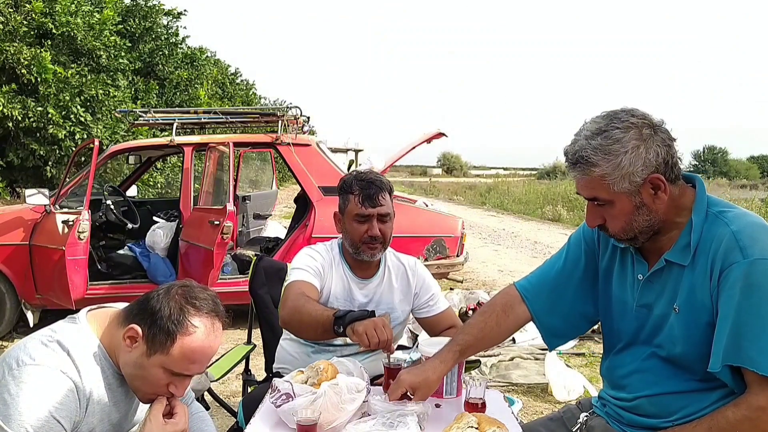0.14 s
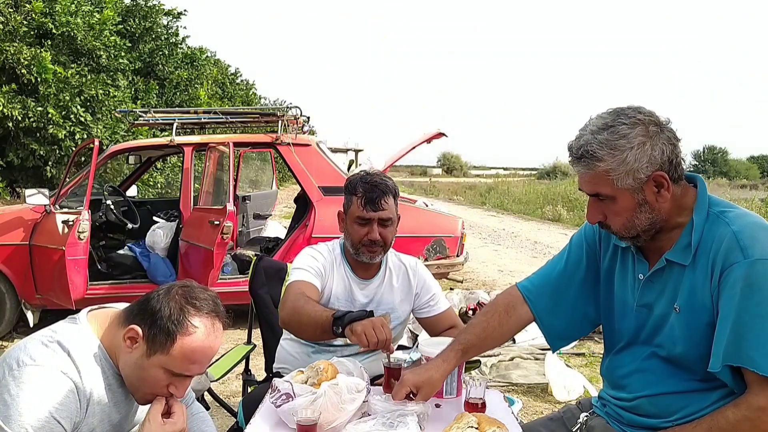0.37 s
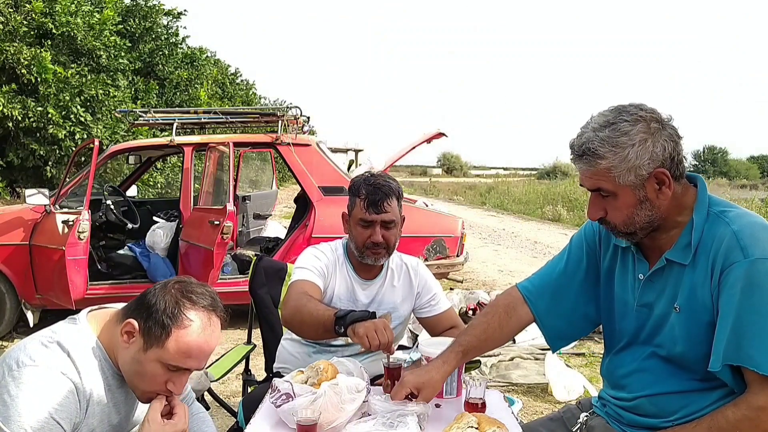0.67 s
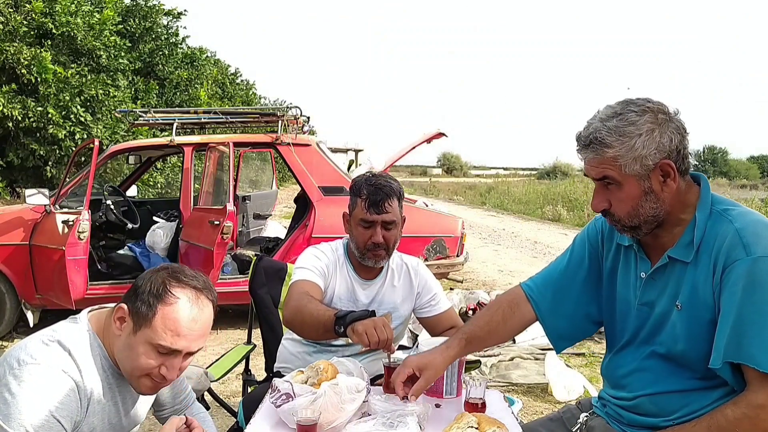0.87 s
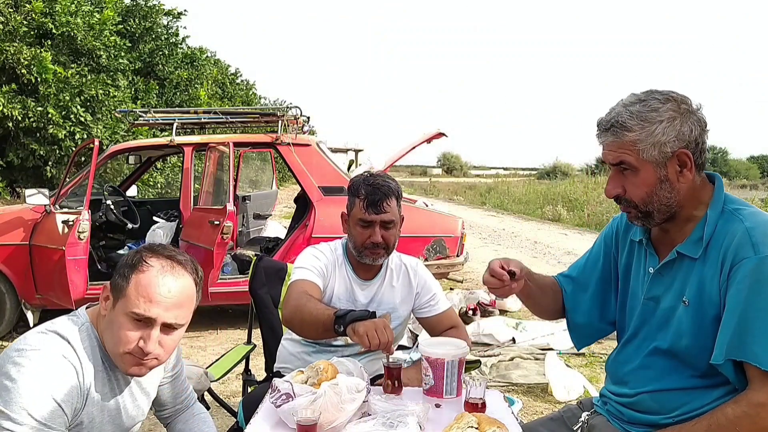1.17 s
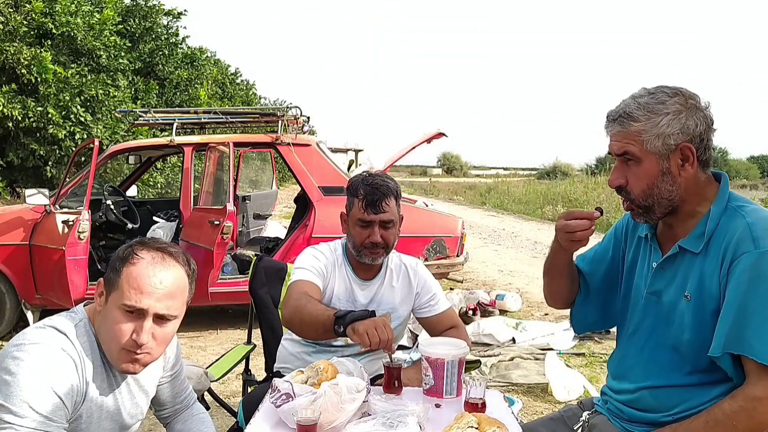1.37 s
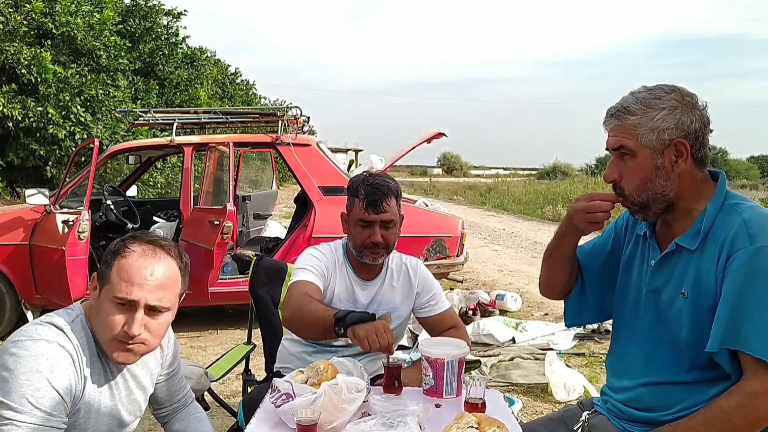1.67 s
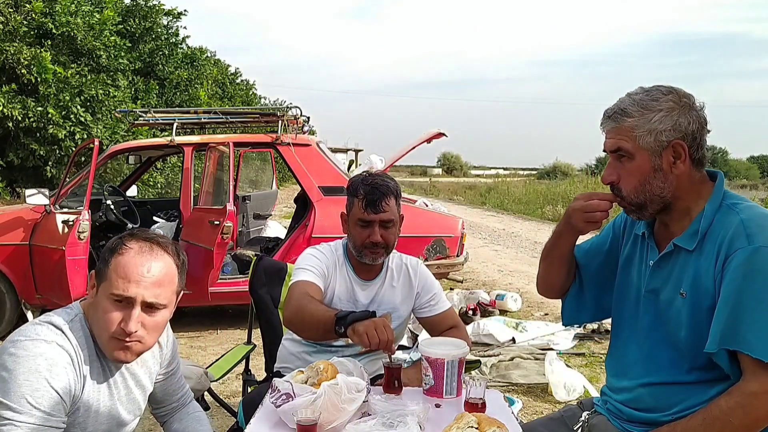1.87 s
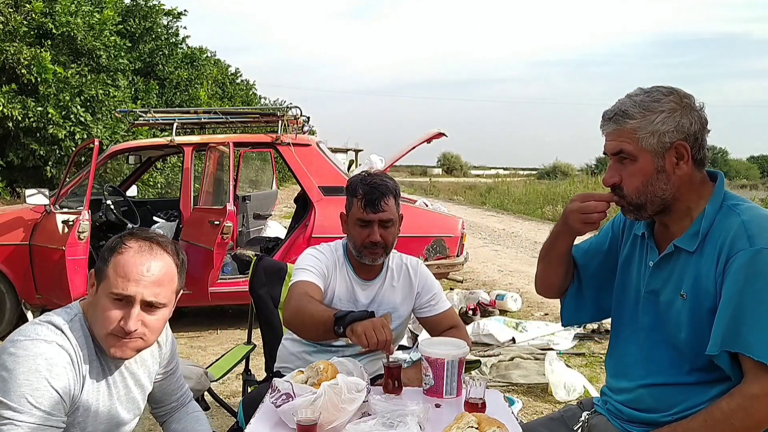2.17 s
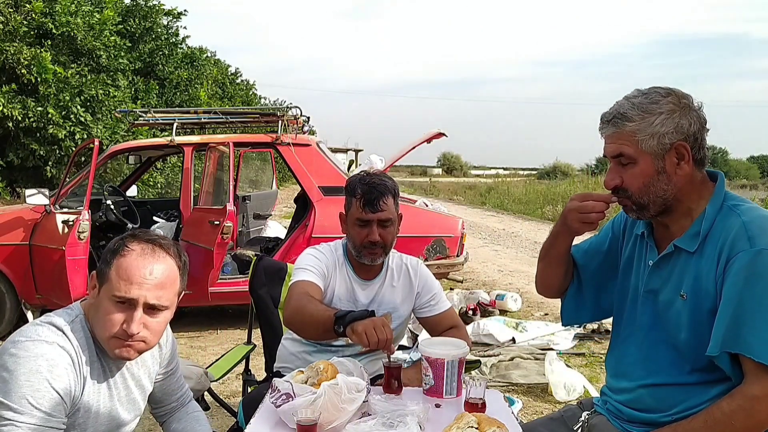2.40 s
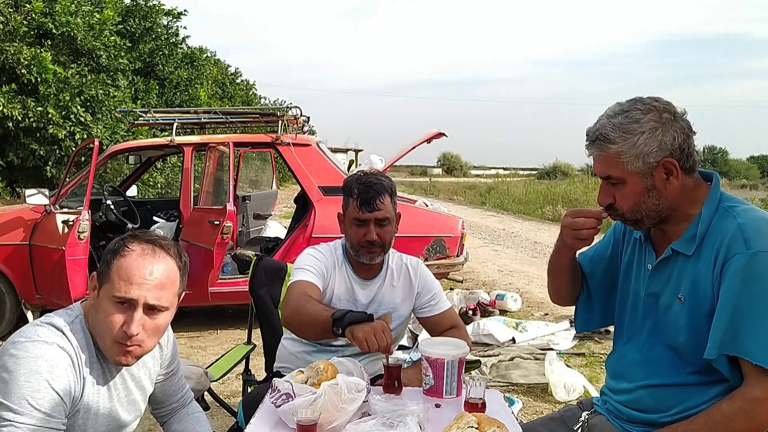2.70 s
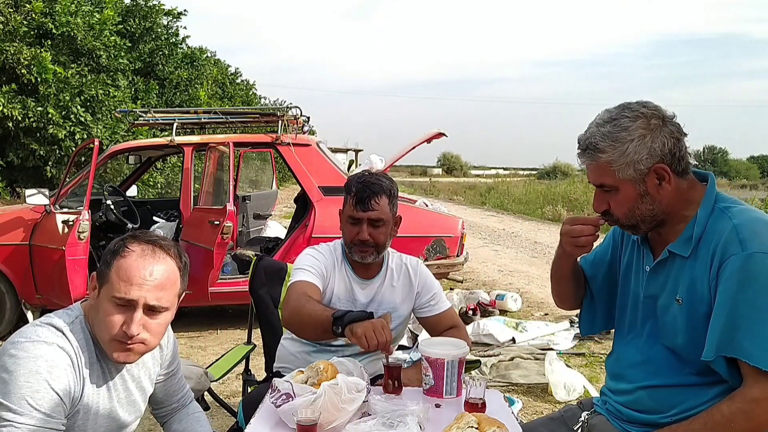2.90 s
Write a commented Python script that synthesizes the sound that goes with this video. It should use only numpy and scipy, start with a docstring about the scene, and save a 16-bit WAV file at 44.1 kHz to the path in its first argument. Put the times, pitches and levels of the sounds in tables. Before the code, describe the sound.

A metal teaspoon stirs tea in a small glass, quick bright ringing clinks outdoors.

```python
"""A steel teaspoon stirs tea in a small glass on an outdoor table, about four turns a second.
Each contact cuts off the old ring and starts a new one from decaying modes, with a crack, a click and a scrape
of noise. The glass's pitch sinks as the swirling tea climbs the wall, and wavers with every turn.
The rocking glass knocks on the table: short modes and a dull noise patter. A weak echo and faint open air,
made of coloured noise, lie behind."""
import sys
import numpy as np
from scipy import signal
from scipy.fft import rfft, irfft, next_fast_len
from scipy.io import wavfile
from scipy.ndimage import map_coordinates

SR = 44100
rng = np.random.default_rng(int(sys.argv[2]) if len(sys.argv) > 2 else 0)


def dump(signal):
    """Clip the signal to [-1, 1] and save it as 16-bit WAV at the path in sys.argv[1]."""
    limited = np.clip(np.atleast_2d(signal).T, -1, 1)
    pcm = np.round(limited * 32767).astype(np.int16)
    wavfile.write(sys.argv[1], SR, pcm)


N = 134505

# spoon meets glass: (time [s], relative levels of the tick, the spoon's ring, the glass's fundamental,
# low, middle and high modes [dB], scrape level [dB], rise scale [s]: longer when it glances)
CONTACTS = [(0.0418, -37, -53, -47.5, -45.5, -40, -47.5, -44, 0.00025),
            (0.0884, -30, -59, -44, -40.5, -38.5, -56, -44, 0.000074),
            (0.1102, -34.5, -56, -40.5, -46.5, -41.5, -52, -43.5, 0.0016),
            (0.1876, -26.5, -43.5, -46.5, -41, -44, -59, -40.5, 0.0003),
            (0.2872, -20, -55, -44, -51, -42, -41, -39.5, 0.001),
            (0.2973, -23.5, -57, -51.5, -49, -41, -44, -42.5, 0.00028),
            (0.4218, -53, -55, -90, -71, -55.5, -66, -52, 0.0002),
            (0.5733, -22.5, -37, -40, -37, -35, -44, -41, 0.00017),
            (0.6228, -37, -42, -43, -55, -44, -59, -40.5, 0.00045),
            (0.6712, -31.5, -41.5, -57, -55, -49, -49, -41, 0.0002),
            (0.7567, -46, -42, -56.5, -54.5, -58, -58, -49.5, 0.00068),
            (0.8076, -22, -29.5, -49, -55, -43.5, -43, -41, 0.00061),
            (0.818, -27, -36, -65, -49.5, -43, -65, -43, 0.00028),
            (0.9034, -50, -61, -54, -49, -42.5, -64, -51, 0.00079),
            (0.929, -38, -45, -56.5, -50.5, -47.5, -75, -47, 0.00046),
            (0.9862, -21, -43, -48, -43, -38, -48.5, -39.5, 0.00018),
            (1.0608, -11.5, -33, -36, -30.5, -20.5, -30, -31.5, 0.0003),
            (1.0807, -27, -45, -44.5, -34, -26, -36, -33.5, 0.00082),
            (1.0997, -35, -37, -43, -39.5, -36.5, -45, -36.5, 0.0015),
            (1.1601, -36, -40, -44.5, -40.5, -38.5, -66, -43.5, 0.00012),
            (1.1843, -40, -60, -52, -56, -59, -63, -41.5, 0.0007),
            (1.2218, -22.5, -48, -44, -43, -40, -53, -41, 0.0002),
            (1.2346, -24, -37, -49, -39.5, -57, -43, -38, 0.0011),
            (1.3097, -17.5, -26, -26, -44, -26, -29, -40, 0.00091),
            (1.312, -16.5, -20.5, -44.5, -38, -24, -31.5, -40, 0.00018),
            (1.3474, -22, -44, -40.5, -33, -25.5, -46, -37, 0.00029),
            (1.3697, -27, -42, -48.5, -45, -42.5, -44, -39, 0.00014),
            (1.4022, -28.5, -33, -51.5, -34.5, -36, -48, -39.5, 0.00011),
            (1.4262, -31, -36.5, -45.5, -41, -43, -52, -48.5, 0.0011),
            (1.4872, -20, -34.5, -44, -41, -38, -45.5, -41, 0.00036),
            (1.551, -45, -62, -49.5, -55, -61, -50, -41, 0.00019),
            (1.5806, -32, -38, -47.5, -44, -37, -43, -44, 0.00073),
            (1.613, -22.5, -40, -44, -32.5, -34.5, -43, -38.5, 0.0001),
            (1.6744, -33.5, -37.5, -53, -68, -76, -61, -43, 0.00025),
            (1.7454, -18, -28.5, -48.5, -31.5, -38, -36, -40, 0.00023),
            (1.8134, -40, -59, -43.5, -54, -55, -52, -44, 0.00057),
            (1.8495, -23.5, -51, -46.5, -34.5, -30.5, -43.5, -38.5, 0.000059),
            (1.916, -44, -49, -60.5, -67, -61, -59, -50.5, 0.00027),
            (1.9873, -21.5, -38, -53, -34, -38.5, -42.5, -40.5, 0.00017),
            (2.0612, -37, -46, -59, -52, -65, -44, -43, 0.0005),
            (2.0736, -22, -38, -42, -45, -28, -43, -47, 0.00027),
            (2.0958, -21, -39, -47, -31.5, -31, -43, -37, 0.00043),
            (2.2254, -15.5, -42, -46.5, -39, -38, -47, -36, 0.00018),
            (2.2446, -20, -35, -44, -34.5, -31.5, -38, -40.5, 0.00032),
            (2.3055, -22.5, -33, -53, -39, -33.5, -41, -37, 0.00092),
            (2.3147, -20, -34, -43.5, -46, -33, -36, -46.5, 0.00052),
            (2.3449, -21.5, -37, -49, -40, -32, -40.5, -37.5, 0.00015),
            (2.407, -30, -39, -55, -39, -35.5, -58, -38, 0.00028),
            (2.4293, -26.5, -31, -44.5, -43, -42, -54, -39.5, 0.00013),
            (2.493, -17, -33, -46.5, -44, -40, -48, -43, 0.00021),
            (2.4995, -22, -45, -42, -33, -41, -38.5, -40.5, 0.0005),
            (2.5643, -23, -37, -39.5, -55, -36, -42, -36.5, 0.00094),
            (2.578, -26.5, -37.5, -44, -49, -30.5, -42, -40, 0.00029),
            (2.6826, -28, -26.5, -48, -47, -37, -49, -39, 0.00077),
            (2.7558, -12.5, -23.5, -43.5, -31, -33.5, -34, -37, 0.00028),
            (2.8545, -21.5, -41, -43, -37, -33, -45, -40.5, 0.0002),
            (2.8797, -25, -37, -47.5, -53, -37.5, -48, -40, 0.00033),
            (2.9089, -30, -39, -42.5, -40.5, -46, -47, -39.5, 0.00058),
            (2.925, -35, -49, -50.5, -39, -40.5, -58, -42.5, 0.00037),
            (3.0049, -25, -43, -46.5, -38.5, -41, -46, -43.5, 0.00026)]


def amp(db):
    """Decibels to gain."""
    return 10 ** (np.asarray(db) / 20)


def unit(x):
    """Scaled to rms 1."""
    return x / np.sqrt(np.mean(np.abs(x) ** 2) + 1e-20)


def wobble(rate):
    """A smooth random curve, rate knots a second."""
    knots = rng.standard_normal(8192)
    return map_coordinates(knots, [np.arange(N) * rate / SR], mode="wrap")


def filtered(x, response):
    """x times a response of frequency."""
    padded = next_fast_len(N + SR // 4)
    hz = np.fft.rfftfreq(padded, 1 / SR)
    return irfft(rfft(x, padded) * response(hz), padded)[..., :N]


def noise(spectrum, side_db):
    """Stereo noise of rms 1, coloured by a curve drawn on a log frequency axis; side_db sets the width."""
    f, db = np.transpose(spectrum)

    def colour(hz):
        return amp(np.interp(np.log(hz + 1), np.log(f + 1), db))

    mid, side = filtered(rng.standard_normal((2, N)), colour)
    side = amp(side_db) * side
    return unit(np.array([mid + side, mid - side]))


def softened(x, attack_s):
    """Rounds off sudden steps with two equal one-pole lowpasses."""
    keep = np.exp(-1 / (attack_s * SR))
    return signal.lfilter([(1 - keep) ** 2], [1, -2 * keep, keep ** 2], x)


def last_contact():
    """For each sample: the latest contact, its age past the rise [s], and how far its force has risen (0-1)."""
    times, *_, rise_s = np.transpose(CONTACTS)
    t = np.arange(N) / SR
    latest = np.searchsorted(times, t) - 1
    since = np.where(latest < 0, 10, t - times[latest])  # long decayed before the first contact
    rise = 2 * (rise_s[latest] + 1 / SR)
    age = np.maximum(since - rise, 0)
    risen = 1 - np.exp(-(since / rise) ** 2)
    return latest, age, risen


def clinks():
    """Every contact excites the modes of glass and spoon anew; their pitch follows the height of the tea."""
    # groups of modes that share a contact level
    families = ["tick", "spoon", "fundamental", "low", "middle", "high"]
    # modes of glass and spoon: (family, frequency in still tea [Hz], relative level [dB], t60 [s],
    # share of pitch lost at full swirl [0-1], left-right difference [dB], left lead [rad])
    modes = [("fundamental", 2044, -1.5, .6, .02, .4, -.2), ("low", 5530, -1, .16, .04, 3.5, -.7),
             ("middle", 6075, 0, .17, .025, -.5, -.5), ("middle", 6450, -14, .11, .025, 0, -.9),
             ("low", 6510, -6, .14, .026, 0, -.9), ("middle", 7040, -22, .09, .008, 1.3, -.2),
             ("high", 8280, -1, .12, .042, -3, -.6), ("spoon", 9875, -1, .11, .007, -.3, 1),
             ("tick", 10770, -1.5, .02, .006, 5, -.4), ("tick", 10800, -11, .085, .009, 5, -.5),
             ("tick", 13310, -23, .09, .007, 1.2, -1.1)]
    # how far the tea has climbed the wall: (time [s], share [0-1])
    climb = [(0, 0), (.3, 0.24), (.6, .35), (1, 0.73), (1.5, .82), (2.2, 0.83), (3.05, 0.99)]
    # pitch swing with every turn, one per family: (share of pitch)
    slosh_depth = [.002, .0013, .0025, .008, .0072, .004]
    # random detuning by the spoon's touch, one per family: (share of pitch)
    detune = [.004, .0012, .0012, .002, .002, .004]
    # smoothing time at a new contact, one per family: (time [s])
    attacks_s = [0.00042, 0.00041, 0.001, 0.00055, 0.00022, 0.00017]
    # the fundamental beats, fading out and swelling back: (time [s])
    beat_nulls = [0.112, 0.269, 0.653, 1.151, 1.27, 1.519, 2.528, 2.675, 3.053]
    beat_width_s = 0.022  # time scale of each fade
    turns_per_s, highest_tea_s = 4.0, 1.47
    scatter_db, phase_scatter_rad, pan_scatter_db = 1, .7, 2  # phase scatter at 10 kHz
    rough_depth, rough_rate, rough_t60_s = .2, 260, .07

    t = np.arange(N) / SR
    latest, age, risen = last_contact()
    swirl = np.interp(t, *np.transpose(climb))
    slosh = np.cos(2 * np.pi * turns_per_s * (t - highest_tea_s))
    beats = np.prod([np.tanh((t - s) / beat_width_s) for s in beat_nulls], axis=0)
    sides = np.array([[.5], [-.5]])  # left, right
    contacts = np.array(CONTACTS)
    starts = np.round(contacts[:, 0] * SR).astype(int)
    out = np.zeros((2, N))
    for family, hz, db, t60, sag, pan_db, lead in modes:
        k = families.index(family)
        size, spread, touch, lean = rng.standard_normal((len(contacts), 4)).T
        # complex strength of each contact on each side
        pan = sides * (pan_db + pan_scatter_db * lean)
        phase = sides * (lead + phase_scatter_rad * spread * hz / 10 ** 4)
        strike = amp(contacts[:, k + 1] + db + scatter_db * size + pan) * np.exp(1j * phase)

        pitch = hz * (1 - sag * swirl - slosh_depth[k] * slosh + detune[k] * touch[latest])
        carrier = np.exp(2j * np.pi * np.cumsum(pitch) / SR)
        if family == "fundamental":
            carrier = carrier * beats  # its phase runs on through the contacts
        else:
            strike = strike / carrier[starts]  # the other modes set off together
        ring = softened(strike[:, latest] * risen * amp(-60 * age / t60), attacks_s[k])

        # the sliding spoon roughens the young ring in level and phase
        flutter = wobble(rough_rate) + 1j * wobble(rough_rate)
        rough = 1 + rough_depth * amp(-60 * age / rough_t60_s) * flutter
        out += np.imag(ring * rough * carrier)
    return out


def scrapes():
    """A short crack and click of noise at each contact, then the spoon grates along the wall."""
    # colour of the crack: (frequency [Hz], relative level per hertz [dB])
    crack_colour = [(200, -65), (1300, -31.5), (2300, -6.5), (3600, -63.5), (4700, -10), (7500, -11),
                    (9500, 1.5), (10700, 2), (12000, -8), (13200, -2), (14200, -25), (16000, -37.5)]
    # first touch, much the same for soft and hard contacts: (frequency [Hz], relative level per hertz [dB])
    click_colour = [(300, -21), (2500, -1), (3600, -12), (6000, 1.5), (16000, -21.5)]
    # colour of the scrape: (frequency [Hz], relative level per hertz [dB])
    scrape_colour = [(200, -11), (700, -7), (1500, -14), (2200, -4), (3500, -20.5), (5000, -13),
                     (6300, 5.5), (7400, -17), (9300, -1.5), (10700, 3), (12000, -31), (13200, -12.5),
                     (14200, -38)]
    crack_db, crack_t60_s = -13, 0.0093  # relative to the contact's tick
    click_db, click_t60_s = -5, 0.011  # relative to the contact's scrape
    slide_db, slide_t60_s = -3.5, 0.15  # relative to the contact's scrape
    grain_db, grain_rate = 3, 180  # random level swing, knots a second

    latest, age, risen = last_contact()
    _, tick_db, *_, scrape_db, _ = np.array(CONTACTS)[latest].T
    crack = amp(tick_db + crack_db - 60 * age / crack_t60_s) * noise(crack_colour, side_db=-20)
    slide = amp(scrape_db + slide_db - 60 * age / slide_t60_s) * noise(scrape_colour, side_db=-6.5)
    click = amp(scrape_db + click_db - 60 * age / click_t60_s) * noise(click_colour, side_db=-17)
    grain = unit(amp(grain_db * wobble(grain_rate)))
    return risen * (crack + click + slide * grain)


def knocks():
    """The foot of the rocking glass taps the table top: its modes and a short, dull patter."""
    # taps on the table: (time [s], relative level [dB])
    taps = [(.151, -48.5), (.423, -46.5), (.705, -48), (.937, -43), (1.187, -38), (1.429, -45.5),
            (1.554, -51.5), (1.675, -42), (1.815, -52), (1.92, -48), (2.062, -46.5), (2.164, -46),
            (2.247, -47), (2.309, -51.5), (2.445, -38), (2.496, -44), (2.685, -40), (2.758, -45.5),
            (2.857, -49), (2.926, -40.5), (3.009, -49.5)]
    # modes of the table top: (frequency before detuning [Hz], relative level [dB], t60 [s])
    table_modes = [(337.6, -14, 0.15), (531.5, -8.5, 0.081), (736, 7, 0.036), (797.4, 0, 0.055),
                   (888, -8.5, 0.048), (1227, -9.5, 0.045), (1642, -15, 0.049)]
    # colour of the patter: (frequency [Hz], relative level per hertz [dB])
    patter_colour = [(250, 18), (500, -60), (750, 35), (1000, -27), (1250, -3), (1700, -15), (2600, -17),
                     (4000, -24.5)]
    rise_cycles, knock_db = 3.5, 1.8
    scatter_db, detune_share = 1, .03
    patter_db, patter_t60_s = -14, .08

    t = np.arange(SR // 3) / SR

    def rise(hz):  # low modes swell more slowly
        return 1 - np.exp(-(t * hz / rise_cycles) ** 2)

    out, patter = np.zeros((2, N + SR))
    for s, level in taps:
        ring = np.zeros(len(t))
        for hz, db, t60 in table_modes:
            envelope = amp(db + rng.normal(0, scatter_db) - 60 * t / t60) * rise(hz)
            ring += envelope * np.sin(2 * np.pi * hz * rng.normal(1, detune_share) * t)
        start = round(s * SR)
        out[start:][:len(t)] += amp(level + knock_db) * ring
        patter[start:][:len(t)] += amp(level + patter_db - 60 * t / patter_t60_s) * rise(hz=614)
    return out[:N] + patter[:N] * noise(patter_colour, side_db=-10)


def echo(x):
    """A short scatter from things nearby: the sound convolved with decaying noise after a brief delay."""
    t60_s, delay_s = .18, .003
    t = np.arange(SR // 4) / SR
    tail = rng.standard_normal((2, len(t))) * amp(-60 * t / t60_s) * (t > delay_s)
    return signal.fftconvolve(x, tail / np.linalg.norm(tail[0]), axes=1)[:, :N]


def air():
    """Quiet countryside with a low rumble: wide, steady coloured noise."""
    # colour of the open air: (frequency [Hz], relative level per hertz [dB])
    air_colour = [(20, 2), (47, -3.5), (65, -6.5), (100, -20.5), (200, -14.5), (330, -20.5), (700, -26),
                  (2200, -29.5), (4000, -34), (10000, -29.5), (12000, -34.5), (16000, -55)]
    return amp(-59.5) * noise(air_colour, side_db=-1.0)


def scene():
    """The glass on its table in the open air, with a weak echo."""
    glass = clinks() + scrapes() + knocks()
    return glass + amp(-21) * echo(glass) + air()


def record(dry):
    """The recorder keeps nothing above its band limit."""
    top_hz = 16600
    return filtered(dry, lambda hz: hz < top_hz)


dry = scene()
out = record(dry)
dump(out)
```